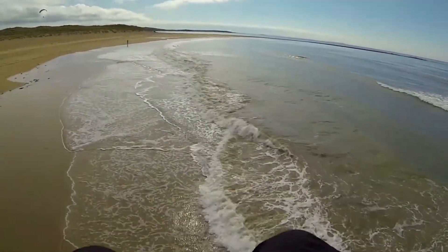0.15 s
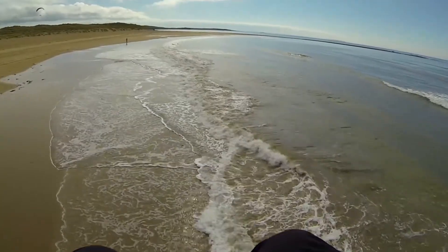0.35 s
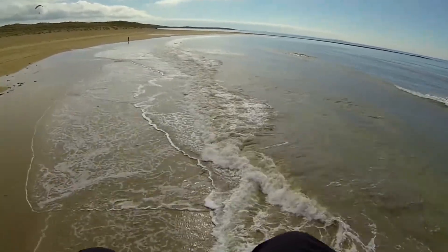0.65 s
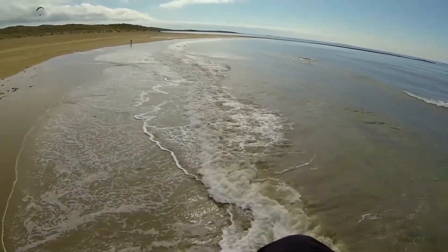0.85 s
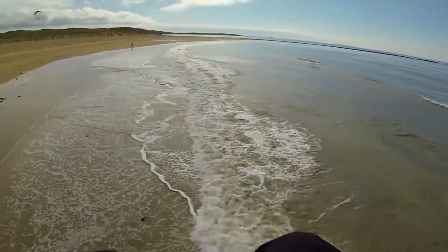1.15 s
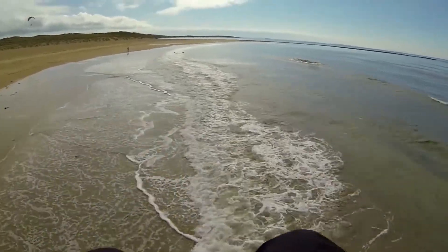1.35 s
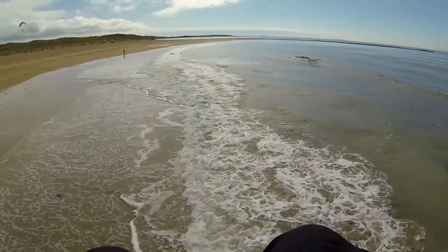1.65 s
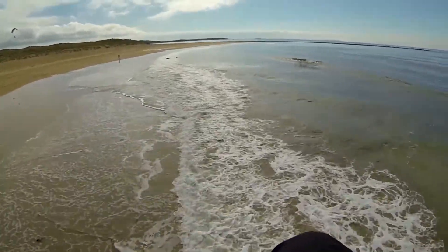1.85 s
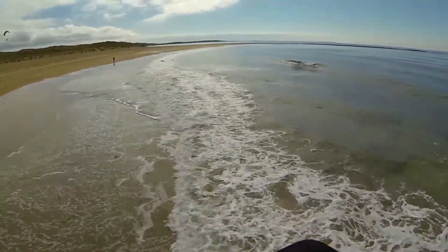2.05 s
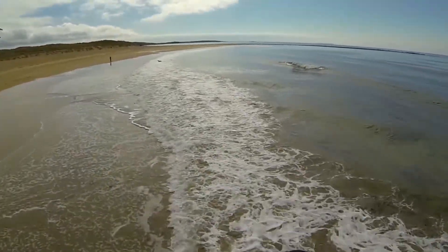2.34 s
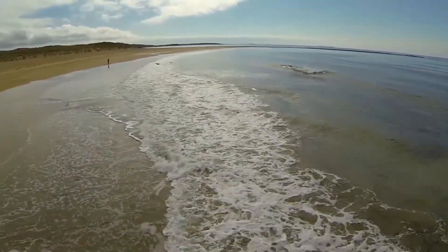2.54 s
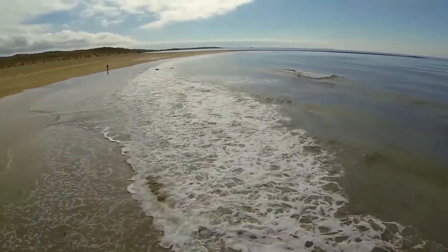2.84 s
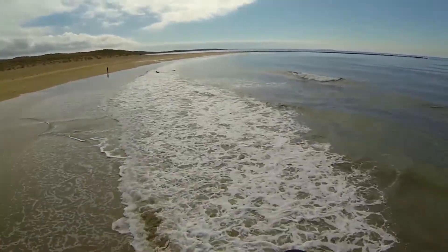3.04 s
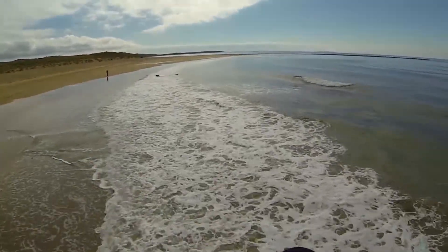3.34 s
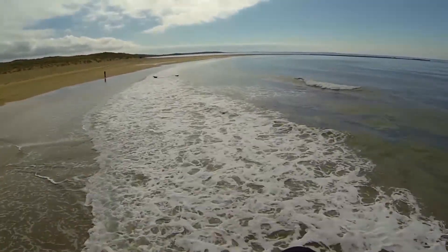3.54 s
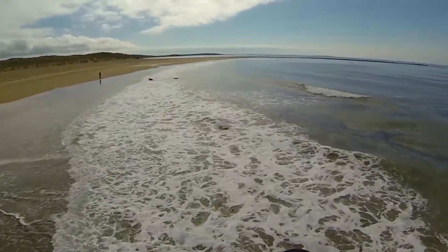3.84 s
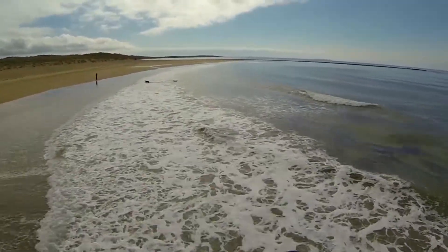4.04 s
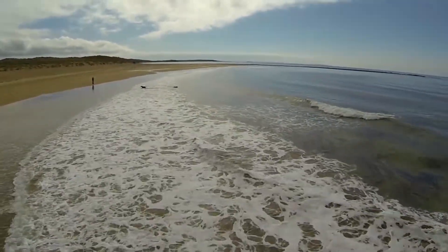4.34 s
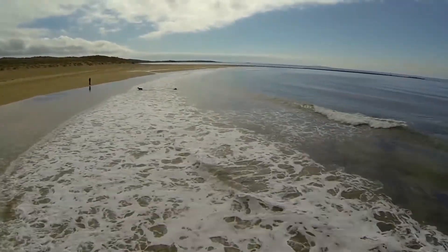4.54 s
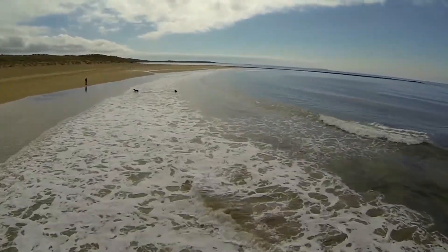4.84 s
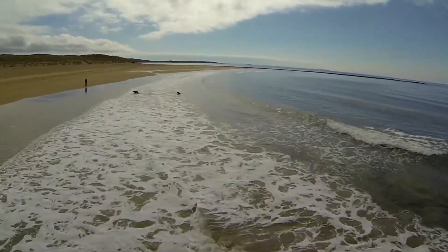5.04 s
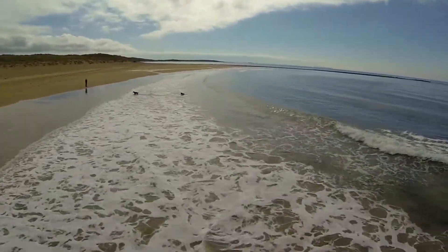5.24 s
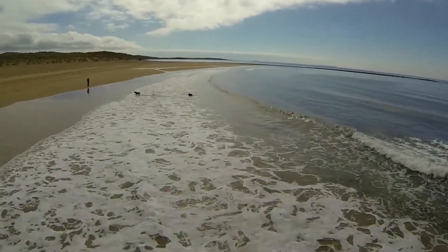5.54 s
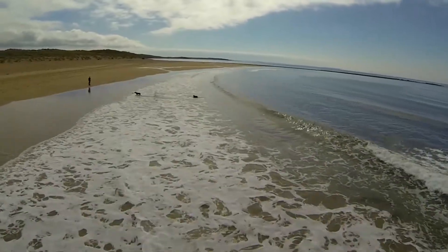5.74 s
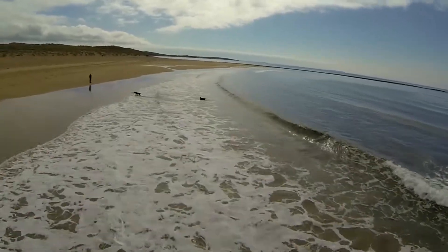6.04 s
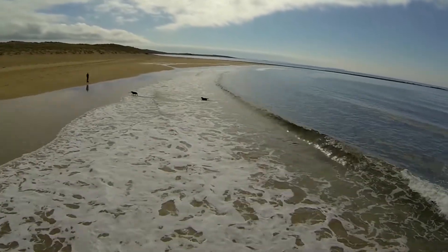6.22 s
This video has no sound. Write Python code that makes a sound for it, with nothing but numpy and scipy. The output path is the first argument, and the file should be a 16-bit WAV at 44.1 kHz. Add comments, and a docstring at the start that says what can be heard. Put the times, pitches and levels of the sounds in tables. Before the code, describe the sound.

Steady raspy paramotor buzz with fluttering propeller thrum and gusty wind on the microphone, loudest at first, gradually easing and sinking slightly in pitch.

```python
"""A paramotor cruises low over a beach, heard from a camera worn by the pilot.
From the start a two-stroke engine drives a two-blade propeller through a reduction of about four to one,
so their overtones beat slowly, while wash and wind rush underneath and the camera case rings and ticks.
It is loudest in the first second, eases, swells again at about 2.5 s as a gust passes, then fades unevenly
to the end as the engine slows a little. Tones are sums of cosines; the air is coloured noise."""
import sys
import numpy as np
from scipy import signal
from scipy.fft import rfft, irfft, next_fast_len
from scipy.io import wavfile

SR = 44100
rng = np.random.default_rng(int(sys.argv[2]) if len(sys.argv) > 2 else 0)


def transcribe(u):
    """Save the signal u as a 16-bit wav file named by the first command-line argument.

    u: samples, shape (n,) or (channels, n), limited to [-1, 1]; the rate is SR.
    q: integer samples, one column per channel.
    """
    v = np.clip(np.atleast_2d(u).T, -1, 1)
    q = np.round(v * 32767).astype(np.int16)
    wavfile.write(sys.argv[1], SR, q)


N = 281358


def from_db(db):
    """Turn decibels into a gain."""
    return 10 ** (np.asarray(db) / 20)


def rms_one(x):
    """Scale a signal to an rms of 1."""
    return x / np.sqrt(np.mean(x ** 2) + 1e-20)


def in_time(rows):
    """Draw straight lines between the rows of a curve: each column at every sample."""
    s, *columns = np.transpose(rows)
    return [np.interp(np.arange(N) / SR, s, column) for column in columns]


def at_hz(points, hz):
    """Read a spectrum between its points, on a log-frequency axis."""
    points = np.array(points)
    return np.interp(np.log(hz), np.log(points[:, 0]), points[:, 1])


def drift(rate):
    """Smooth random motion of spread 1; a higher rate moves faster."""
    step = 40  # samples between computed points
    r = np.exp(-2 * step * np.pi * rate / SR)
    raw = rng.standard_normal(N // step + 2002)
    slow = signal.lfilter([1], [1, -2 * r, r * r], raw)[2000:]  # skip the filter's start
    return np.interp(np.arange(N) / step, np.arange(len(slow)), rms_one(slow))


def swells(events):
    """Each swell rises and falls smoothly; their summed lift in dB."""
    t = np.arange(N) / SR
    lift = 0
    for s, length, lift_db in events:
        place = np.clip((t - s) / length, -.5, .5)
        lift = lift + lift_db * np.cos(np.pi * place) ** 2
    return lift


def noise(spectrum):
    """Steady noise of a given colour, falling away below its first and above its last point; rms 1."""
    size = next_fast_len(N)
    hz = np.maximum(np.fft.rfftfreq(size, 1 / SR), 1)
    gain = from_db(at_hz(spectrum, hz))
    gain = gain * np.minimum(spectrum[-1][0] / hz, 1) ** 4
    gain = gain * np.minimum(hz / spectrum[0][0], 1)
    white = rng.standard_normal(size)
    return rms_one(irfft(rfft(white) * gain, size)[:N])


def tone(cycles, flutter=0, flutter_rate=9):
    """A single tone of rms 1; turbulent air shakes its strength and phase."""
    angle = 2 * np.pi * cycles
    in_phase = (1 + flutter * drift(flutter_rate)) * np.cos(angle)
    sideways = flutter * drift(flutter_rate) * np.sin(angle)
    return np.sqrt(2 / (1 + 2 * flutter ** 2)) * (in_phase + sideways)


def beating(overtones, firings, passes, flutter):
    """Each engine overtone has a blade overtone just below it; the pair beats, the higher the faster."""
    out = 0
    for k, engine_db, blade_db in overtones:
        k, scatter = round(k), rng.random()
        out = out + from_db(engine_db) * tone(k * firings + scatter, flutter)
        out = out + from_db(blade_db) * tone(2 * k * passes + scatter, flutter)
    return out


def gained(firings, passes, s):
    """How many firings the engine is ahead of the blades (two passes per firing) at a given time."""
    return np.interp(s * SR, np.arange(N), firings - 2 * passes)


# Levels in dB where the loudness is 0 dB; the wash level also sets the exhaust and upper blade overtones
WASH_DB, RASP_DB, HISS_DB, WHINE_DB, WIND_DB = -26.5, -35.5, -47.5, -39, -30
# dB gained for each dB of loudness
RASP_FOLLOWS, WHINE_FOLLOWS, WIND_FOLLOWS = 1.03, 1.12, 0.85
# Lopsidedness of the low pulses: the same phase shift for each tone, in cycles
SKEW = -0.18

# Exhaust boom, and the sum and difference tones made as the blades chop it.
# Each row: multiple of the firing rate, plus multiple of the blade rate, level in dB at loudness 0,
# dB gained for each dB of loudness, time in seconds when it is in step with the nearest thrum overtone.
BOOM_TONES = [(1, 0, -27, 1.2, 3.15), (2, 0, -16.5, .5, 3.655), (3, 0, -36.5, 1.49, 3.406),
              (1, 2, -35.5, .5, 4.1), (1, 3, -37, -0.6, 2.56), (2, 1, -47.5, 1.9, 3.45),
              (3, -1, -43, -0.3, 2.72)]
# Exhaust overtones. Each row: multiple of the firing rate, level in dB relative to the wash,
# level in dB of the blade overtone beside it, also relative to the wash.
EXHAUST_TONES = [(4, -11.5, -23), (5, -11.5, -19.5), (6, -13.5, -23), (7, -9.5, -18), (9, -20.5, -28)]
# The engine's whine. Each row: multiple of the firing rate, level in dB relative to the whine,
# level in dB of the blade overtone beside it, also relative to the whine.
WHINE_TONES = [(8, -2, -15.5), (10, -11, -16), (11, -8.5, -16.5), (12, -3, -7), (13, 4.05, -14.5)]
# How the whine comes and goes, beyond what loudness gives it. Each row: time in seconds, lift in dB.
WHINE_LIFT_CURVE = [(0.0, 0.5), (0.4, 0), (1.15, 4.0), (2.0, 1.5), (2.65, -1.5), (3.0, -7.5), (3.5, -1.5),
                    (4.7, -0.7), (6.38, -2.5)]
# Rasp, mostly above the whine. Each row: multiple of the firing rate, level in dB relative to the rasp,
# level in dB of the blade overtone beside it, also relative to the rasp.
RASP_TONES = [(14, -8.5, -10.5), (15, -5.5, -19), (16, -12, -21), (17, -23.5, -21), (18, -25.5, -29.5),
              (20, -33, -34.5), (22, -30.5, -33.5), (24, -27, -29), (25, -29.5, -33), (28, -26.5, -37.5),
              (31, -38.5, -42.5), (38, -35, -39), (39, -39, -41)]
# Brief surges of the upper overtones. Each row: time of the height in seconds, length in seconds,
# full lift in dB, which exhaust and rasp take only in part.
ENGINE_SURGES = [(0.7, 0.32, 1.5), (2.65, .4, 2), (5.04, 0.18, 2.5)]


def engine(firings, passes, loud_db):
    """The exhaust booms at low multiples of the firing rate; higher overtones bark, whine and rasp."""
    boom = 0
    for k, blades, db, follows, s in BOOM_TONES:
        in_step = firings - gained(firings, passes, s)
        cycles = round(k) * in_step + round(blades) * passes
        boom = boom + from_db(db + follows * loud_db) * tone(cycles + SKEW, flutter=0.048)
    surge_db = swells(ENGINE_SURGES)
    exhaust_db = WASH_DB + loud_db + 0.76 * surge_db
    exhaust = from_db(exhaust_db) * beating(EXHAUST_TONES, firings, passes, flutter=0.22)
    whine_db = WHINE_DB + WHINE_FOLLOWS * loud_db + in_time(WHINE_LIFT_CURVE)[0] + surge_db
    whine = from_db(whine_db) * beating(WHINE_TONES, firings, passes, flutter=0.11)
    rasp_db = RASP_DB + RASP_FOLLOWS * loud_db + 0.6 * surge_db
    rasp = from_db(rasp_db) * beating(RASP_TONES, firings, passes, flutter=0.31)
    return boom + exhaust + whine + rasp


# Low propeller thrum. Each row: multiple of the blade rate, level in dB at loudness 0,
# dB gained for each dB of loudness.
THRUM_TONES = [(1, -24, 0.85), (2, -20, 1.2), (3, -20, 0.68), (4, -28.5, 1), (5, -35, 0.5), (6, -40, 1.45)]
# Strength of the upper blade overtones. Each row: frequency in Hz, level in dB relative to the wash.
BLADE_SPECTRUM = [(230, -6.5), (330, -20.5), (460, -9), (590, -11.5), (720, -12.5), (855, -10.5),
                  (980, -23.5), (1150, -17), (1400, -20.5), (1640, -17), (1880, -14.5), (2050, -28),
                  (2350, -26.5), (2600, -43)]


def propeller(passes, blade_hz, loud_db, uneven_db=-5.5):
    """Each passing blade pushes out one slightly lopsided pressure pulse."""
    thrum = 0
    for k, db, follows in THRUM_TONES:
        thrum = thrum + from_db(db + follows * loud_db) * tone(round(k) * passes + SKEW, flutter=0.046)
    # the upper overtones arrive scattered by cage and pilot; the even ones lie beside the engine's
    buzz = 0
    for k in np.arange(7, 40, 2):
        gain = from_db(at_hz(BLADE_SPECTRUM, k * blade_hz))
        buzz = buzz + gain * tone(k * passes + rng.random(), flutter=0.22, flutter_rate=4.0)
    # the two blades differ a little, which adds tones between the overtones
    wobble = 0
    for k in np.array([3, 10, 11, 17, 24, 25, 26, 27, 28, 29, 31, 33, 34, 35]) + .5:
        gain = from_db(at_hz(BLADE_SPECTRUM, k * blade_hz) + uneven_db)
        wobble = wobble + gain * tone(k * passes + rng.random(), flutter=0.65, flutter_rate=9.3)
    return thrum + from_db(WASH_DB + loud_db) * (buzz + wobble)


def stroke(cycles, sharpness):
    """One rounded peak per cycle, with a mean of zero."""
    peak = np.exp(sharpness * np.cos(2 * np.pi * cycles))
    return (peak - peak.mean()) / peak.max()


# Resonances of the camera case. Each row: frequency in Hz, width in Hz, lift in dB.
CASE_RESONANCES = [(5000, 630, 4), (8310, 490, 10.5), (10400, 180, 2.5), (12900, 370, 11)]


def case(x):
    """The camera case rings, lifting a few narrow treble bands."""
    for hz, width_hz, lift_db in CASE_RESONANCES:
        r = np.exp(-np.pi * width_hz / SR)
        top = np.array([1, 0, -1]) * (1 - r * r) / 2
        bottom = [1, -2 * r * np.cos(2 * np.pi * hz / SR), r * r]
        band = signal.lfilter(top, bottom, x)
        x = x + (from_db(lift_db) - 1) * band
    return x


# Colours of wind, propeller wash and hiss; only the shape counts, as each noise is scaled to rms 1.
# Each row: frequency in Hz, level in dB per Hz.
WIND_SPECTRUM = [(12, -12.5), (24, 2), (40, -1.5), (80, -2), (120, -5), (200, -16), (400, -25.5),
                 (900, -49.5)]
WASH_SPECTRUM = [(50, -8.5), (110, 0.5), (200, 4), (330, 4), (450, 2), (600, -3), (830, 0.5), (1020, -1),
                 (1200, -9), (1450, -7.5), (1800, -5), (2050, -7), (2300, -17), (2700, -36.5)]
HISS_SPECTRUM = [(1800, -20), (2400, 0.5), (2700, -2.5), (3250, 0), (3800, -8), (4400, -13), (5300, -14),
                 (5750, -21), (6250, -20), (7000, -28), (9000, -26.5), (11000, -29), (12200, -34.5),
                 (15000, -38.5)]
# Gusts on the microphone. Each row: time of the height in seconds, length in seconds, lift in dB.
WIND_GUSTS = [(2.45, 1, 7.5), (3.12, .4, 5.5), (4.8, 1.0, 4.5)]


def rushing_air(firings, passes, loud_db, chuff=0.52, chop=0.091):
    """Lumpy wind on the microphone; wash and hiss swell with every firing and every blade."""
    pulsing = 1 + chuff * stroke(firings, sharpness=9.9) + chop * stroke(passes, sharpness=1.1)
    wind_db = WIND_DB + WIND_FOLLOWS * loud_db + swells(WIND_GUSTS) + 1.0 * drift(4.1)
    wind = from_db(wind_db) * noise(WIND_SPECTRUM)
    wash = from_db(WASH_DB + loud_db + 1.0 * drift(14)) * noise(WASH_SPECTRUM)
    hiss = from_db(HISS_DB + loud_db + 0.62 * drift(11)) * noise(HISS_SPECTRUM)
    return wind + pulsing * (wash + case(hiss))


# Sharper isolated ticks. Each row: time in seconds, peak in dB before the case rings.
SHARP_TICKS = [(0.1754, -33), (0.3894, -32), (0.6894, -35), (0.7144, -34), (0.7774, -38), (0.8394, -32),
               (0.9752, -33), (1.1433, -33), (2.4663, -35), (3.2094, -36)]


def ticking(firings, hiss_db, buzz_db=-4.5, spread_db=3.0):
    """Every firing shakes a tiny tick out of the case; now and then a sharper tick snaps in."""
    at = np.flatnonzero(np.diff(np.floor(firings)) > 0)
    uneven_db = spread_db * np.clip(rng.standard_normal(len(at)), -2, 2)
    clicks = np.zeros(N)
    clicks[at] = from_db(hiss_db[at] + buzz_db + uneven_db)
    for s, db in SHARP_TICKS:
        clicks[round(s * SR)] += from_db(db)
    # each tick is a brief treble snap of height 1
    treble = signal.butter(1, [2500, 7000], "band", fs=SR, output="sos")
    snap = signal.sosfilt(treble, signal.unit_impulse(64))
    return case(np.convolve(clicks, snap / snap.max())[:N])


# Engine turns per propeller turn
REDUCTION = 4.0068
# Engine speed before a slight unevenness. Each row: time in seconds, firings per second.
SPEED_CURVE = [(0.0, 131.7), (0.25, 132.0), (0.6, 131.85), (0.8, 131.2), (1.35, 130.85), (1.75, 131.7),
               (2.4, 131.1), (2.8, 130.5), (3.0, 130.45), (3.38, 129.6), (3.65, 129.7), (4.22, 128.88),
               (4.6, 128.92), (4.95, 129.3), (5.2, 129.05), (5.5, 128.45), (5.85, 129.0), (6.38, 127.85)]
# Loudness of the whole machine at the camera. Each row: time in seconds, loudness in dB.
LOUDNESS_CURVE = [(0.0, 6), (0.2, 8), (0.62, 8), (1.0, 4.6), (1.4, 2.5), (2.0, 2.5), (2.55, 5), (3.2, 1.46),
                  (4.0, -3), (4.4, -2), (5.05, -1.5), (5.6, -6.5), (6.38, -10)]


def scene():
    """One shaft drives engine and propeller sounds together; one loudness guides all but the sharp ticks."""
    firing_hz, = in_time(SPEED_CURVE)
    loud_db, = in_time(LOUDNESS_CURVE)
    # the crankshaft runs a little unevenly
    turns = np.cumsum(firing_hz) / SR + 0.0021 * drift(8.3)
    firings = turns - .13  # one firing per turn
    passes = 2 * turns / REDUCTION - .11  # two blades
    blade_hz = 2 * firing_hz.mean() / REDUCTION
    motor = engine(firings, passes, loud_db) + propeller(passes, blade_hz, loud_db)
    air = rushing_air(firings, passes, loud_db)
    return (motor + air + ticking(firings, HISS_DB + loud_db))[None]


CUTOFF_HZ = 15200


def record(dry):
    """The highest peaks are rounded off, and the top of the treble is cut steeply."""
    rounded = dry / (1 + (dry / 1.05) ** 8) ** (1 / 8)
    lowpass = signal.ellip(10, .1, 70, CUTOFF_HZ, fs=SR, output="sos")
    return signal.sosfilt(lowpass, rounded)


dry = scene()
out = record(dry)
transcribe(out)
```